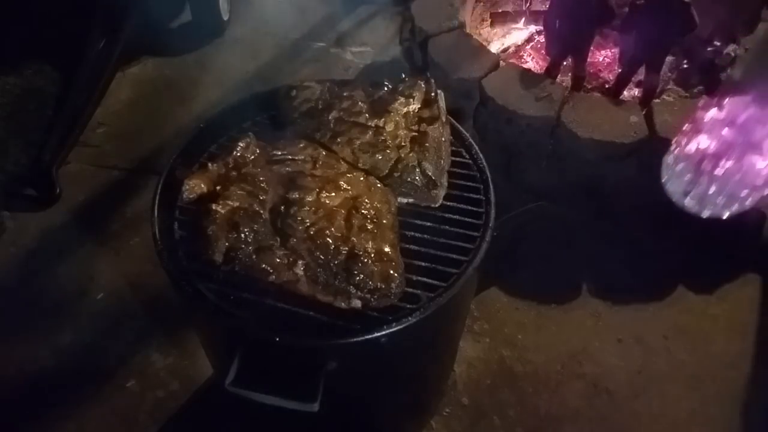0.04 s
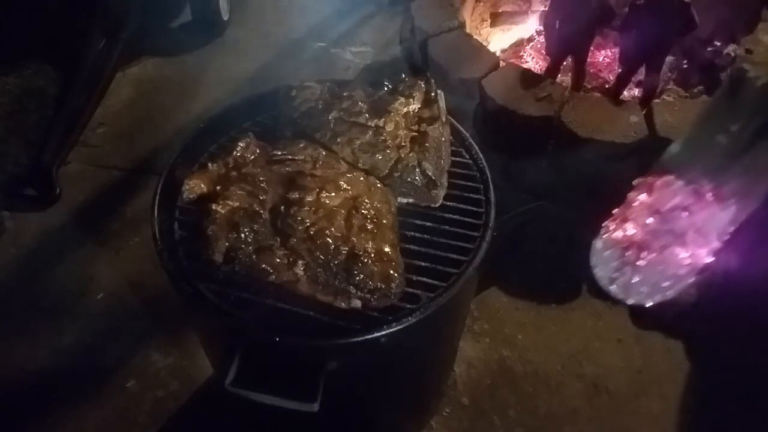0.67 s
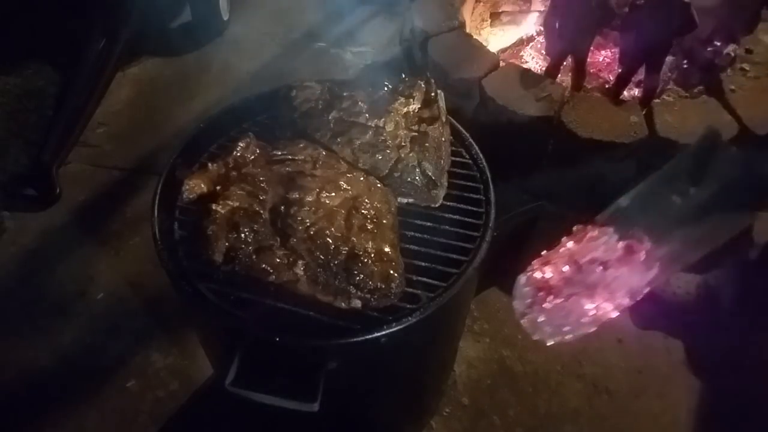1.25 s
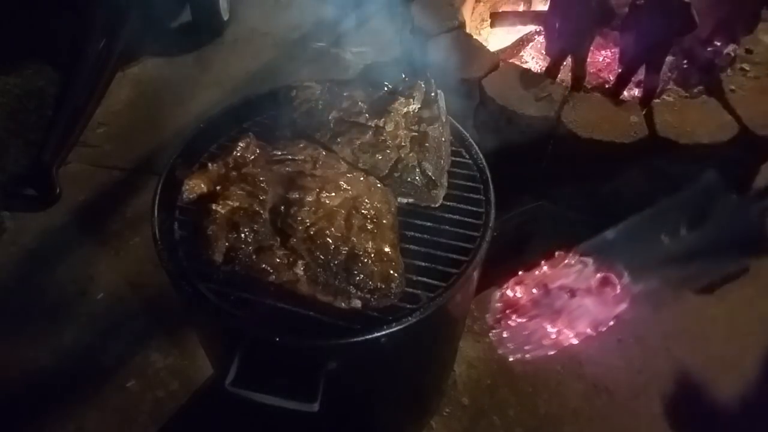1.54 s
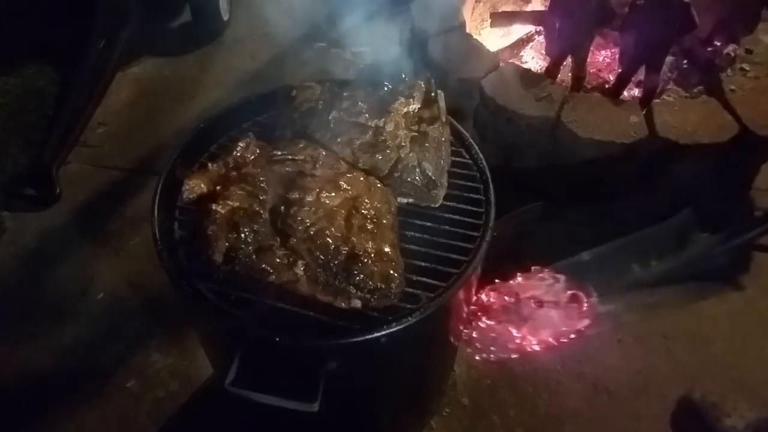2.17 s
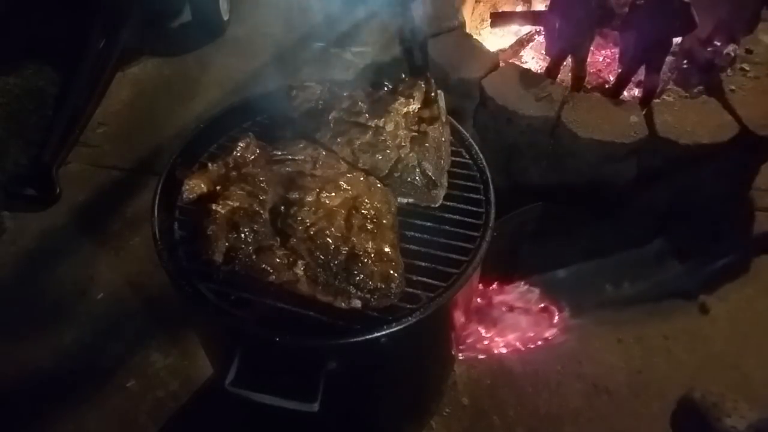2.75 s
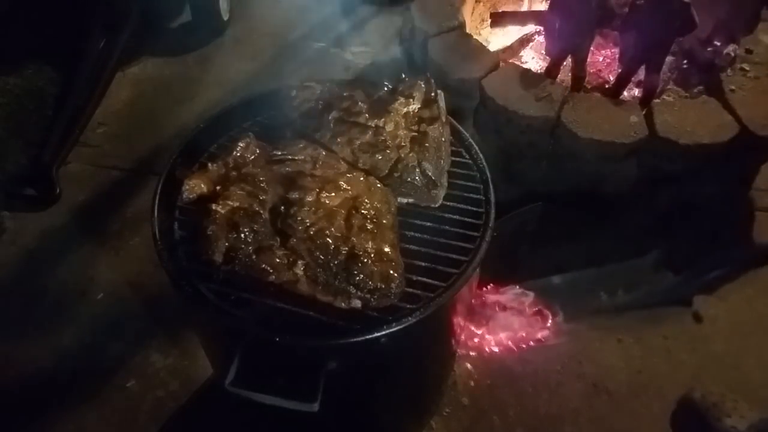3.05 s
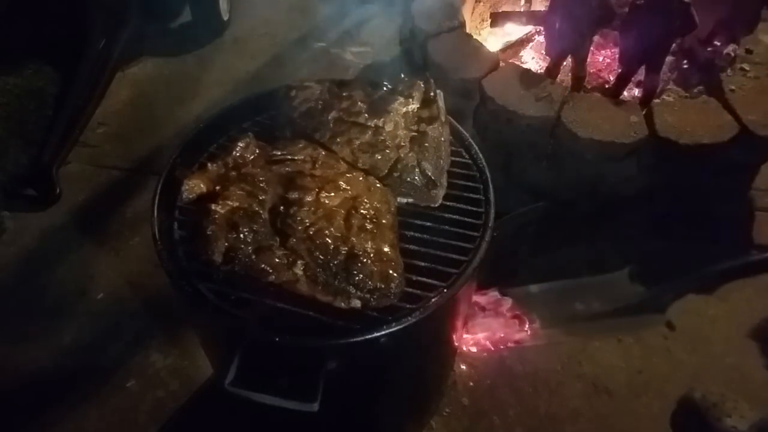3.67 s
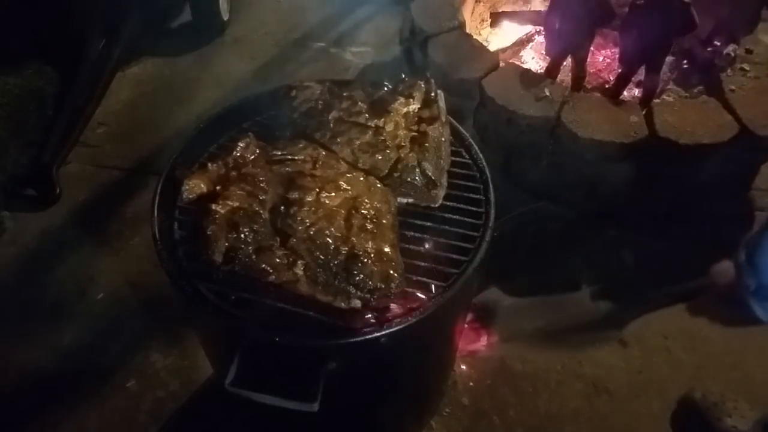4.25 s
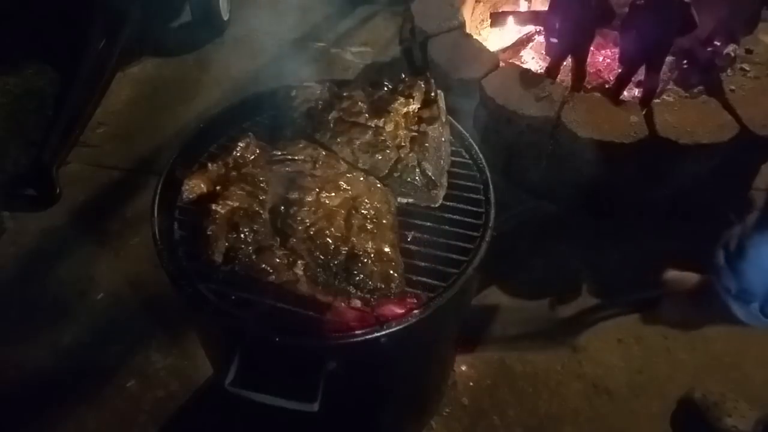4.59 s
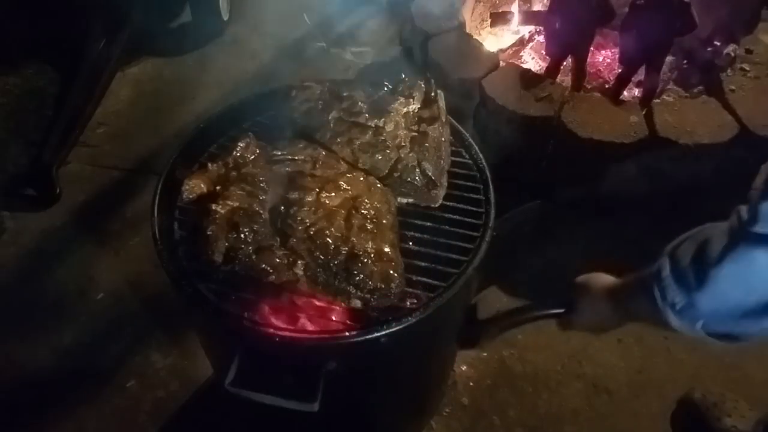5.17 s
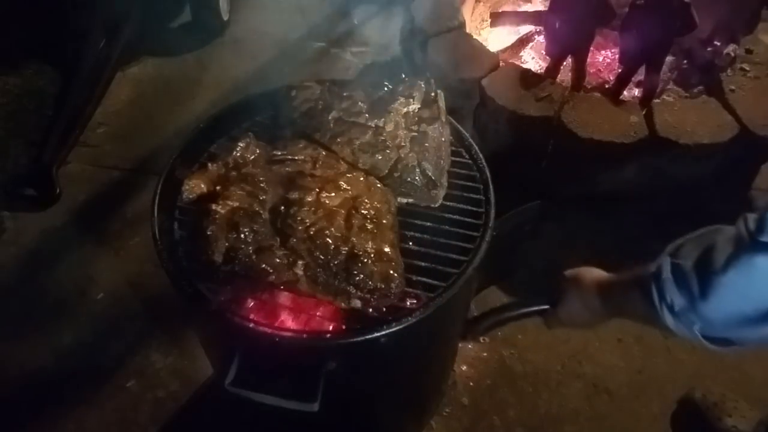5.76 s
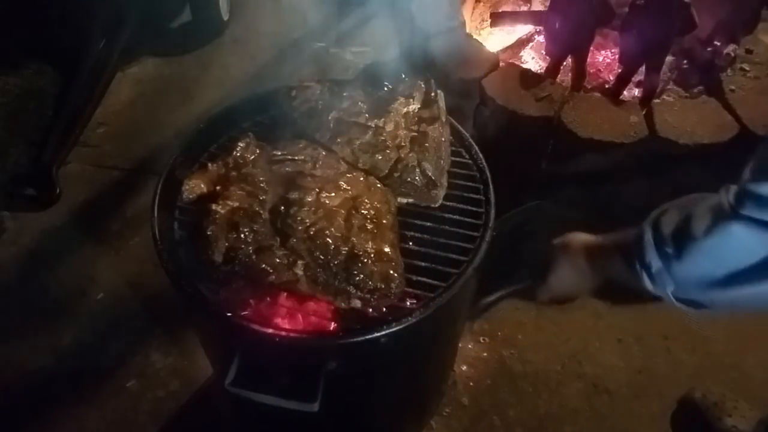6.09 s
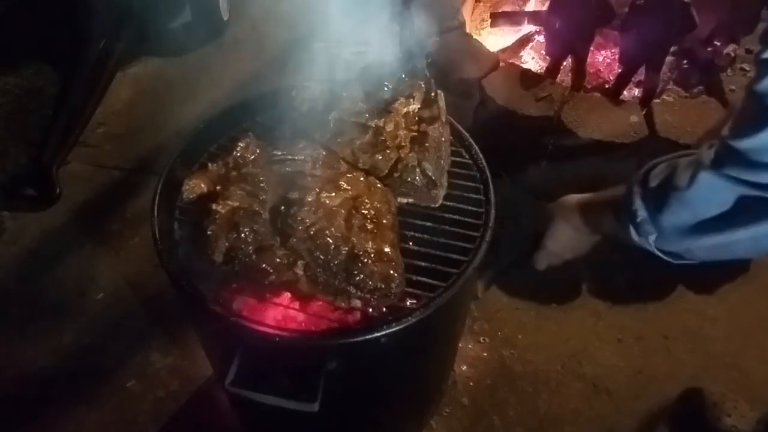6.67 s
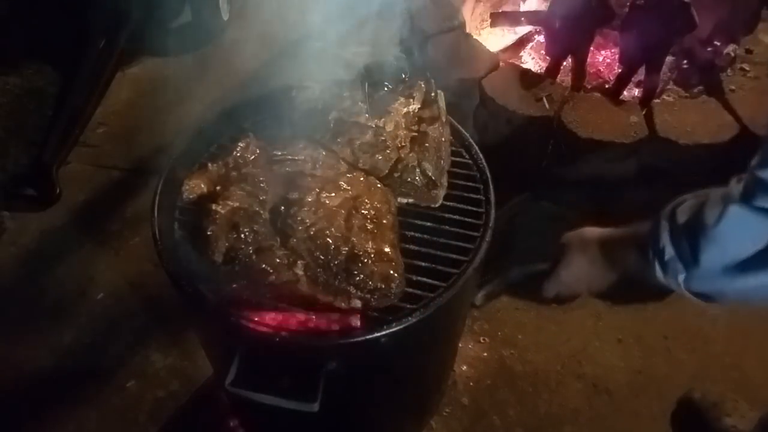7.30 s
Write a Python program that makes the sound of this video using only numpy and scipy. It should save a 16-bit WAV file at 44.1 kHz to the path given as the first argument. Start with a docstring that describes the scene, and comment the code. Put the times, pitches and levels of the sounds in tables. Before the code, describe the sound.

A low, distant rumble with a wavering hum runs throughout, outdoors. For the first two seconds, nearby embers sizzle faintly, with short spurts of hiss and sharp, high snaps, busiest around 1.5 seconds. At about 2.5 seconds a steel shovel bumps a small drum smoker, and more hollow knocks, clanks and short scrapes follow until 4 seconds. The blade then grinds in over grit, loudest around 4.3 to 4.5 seconds, where it squeals briefly on the rim and the drum booms and rings. The scraping carries on with heavy knocks near 4.7 and 5 seconds, while the sizzle swells slightly. From about 5.3 to 6 seconds the blade is shaken empty with clanks and judder. It is drawn back with ringing scrapes between 6 and 6.9 seconds, ending in a faint clink at 7 seconds. Scattered ember snaps continue through the shovelling.

```python
"""Embers sizzle and snap over a low, far-off hum, outdoors at night.
Then a steel shovel pushes glowing coals through the door of a small drum smoker.
The blade bumps the door, grinds in over grit, squeals as it sticks and slips on the rim,
is shaken empty and drawn back. Its knocks and judder make the drum boom and ring."""
import sys
import numpy as np
from scipy import signal
from scipy.fft import rfft, irfft
from scipy.io import wavfile

SR = 44100
rng = np.random.default_rng(int(sys.argv[2]) if len(sys.argv) > 2 else 0)


def to_wav(sig):
    """Store sig (one row per channel, or 1-D mono) as 16-bit WAV at the path in sys.argv[1].

    Samples outside -1..1 are clipped; the rate is SR.
    """
    pcm = np.clip(np.atleast_2d(sig), -1, 1) * 32767
    pcm = np.round(pcm).astype(np.int16)
    wavfile.write(sys.argv[1], SR, pcm.T)  # frames by channels


N = 323253
TIME = np.arange(N) / SR
FREQ = np.maximum(np.fft.rfftfreq(N, 1 / SR), 1)


def undb(db):
    """Turn decibels into a gain."""
    return 10 ** (np.asarray(db) / 20)


def unit(x):
    """Scale a signal to an average (rms) level of 1."""
    return x / np.sqrt(np.mean(x ** 2))


def add(track, start_s, sound):
    """Mix a sound into a track."""
    i = int(start_s * SR)
    track[..., i:i + sound.shape[-1]] += sound[..., :N - i]


def pan(x, left_db):
    """Make the left side louder than the right by left_db."""
    return x * undb(np.array([[left_db], [-left_db]]) / 2)


def gain_curve(points):
    """Gain at every moment, from (time_s, level_db) points."""
    time_s, level_db = np.transpose(points)
    return undb(np.interp(TIME, time_s, level_db))


def swell(start_s, rise_s, hold_s, fall_s, size=N):
    """A level that builds slowly, then fast, holds, and drops 20 dB every fall_s."""
    t = TIME[:size] - start_s
    build = np.clip(t / rise_s, 0, 1) ** 1.7
    return build * undb(-20 * np.clip((t - rise_s - hold_s) / fall_s, 0, 10))


def wander(turns_per_s, size=N):
    """A smooth random drift, typically about 1 away from zero."""
    points = rng.standard_normal(2048)
    return 1.2 * np.interp(TIME[:size] * turns_per_s, np.arange(len(points)), points)


def grains(per_s, spread_db, channels=1):
    """Random clicks, mostly small, a few large."""
    shape = (channels, N)
    sizes = undb(spread_db * np.minimum(rng.exponential(size=shape), 5))
    hits = rng.random(shape) < per_s / SR
    return unit(hits * rng.choice([-1, 1], shape) * sizes)


def stereo_noise(split_hz, size):
    """Noise that is nearly alike in both ears below split_hz and unrelated above it."""
    mid, side, stray = rng.standard_normal((3, size))
    side = signal.sosfilt(signal.butter(3, split_hz, "high", fs=SR, output="sos"), side)
    side += undb(-22) * stray
    return np.array([mid + side, mid - side]) / np.sqrt(2)


def colour(points):
    """Gain at every frequency, from (pitch_hz, level_db) points."""
    hz, db = np.transpose(points)
    return undb(np.interp(np.log(FREQ), np.log(hz), db))


def resonances(modes):
    """How each mode (a pitch at which a thing likes to ring) answers every frequency."""
    return np.array([undb(db) / (1 + 1j * (FREQ ** 2 - hz ** 2) / (FREQ * width))
                     for hz, width, db in modes])


def impulse(gain, band_hz=(0, SR), size=4096):
    """A filter's answer to one click. Only the shape of gain counts: band_hz is scaled to level 1."""
    in_band = (FREQ > band_hz[0]) & (FREQ < band_hz[1])
    gain = np.abs(gain) / np.sqrt(np.mean(np.abs(gain) ** 2 * in_band))
    gain = np.interp(np.fft.rfftfreq(4 * size, 1 / SR), FREQ, gain)
    # Folding the cepstrum puts all the ringing after the click.
    cepstrum = irfft(np.log(gain + 1e-6))
    cepstrum[1:2 * size] *= 2
    cepstrum[2 * size + 1:] = 0
    return irfft(np.exp(rfft(cepstrum)))[:size]


def modal(modes, spread_hz):
    """The ring of a group of modes, strongest within spread_hz around their middle."""
    middle_hz = np.mean([hz for hz, _, _ in modes])
    peaks = np.sqrt(np.sum(np.abs(resonances(modes)) ** 2, axis=0))
    focus = np.abs(resonances([(middle_hz, spread_hz, 0)])[0]) ** 2
    return impulse(peaks * focus)


def ring(x, response):
    """Play a signal through a filter, a ringing object or a space."""
    return signal.fftconvolve(np.atleast_2d(x), np.atleast_2d(response), axes=-1)[:, :x.shape[-1]]


def night(rumble_db=-56):
    """A far-off rumble and two low, wavering hums that swell and fade."""
    # Tone of the rumble: pitch_hz, relative_db
    rumble_colour = [(12, -36.5), (20, -11), (37, -9.5), (74, -1), (101, 1), (207, -11.5), (270, -8),
                     (342, -16), (735, -17), (1730, -33.5), (2670, -35.5), (6000, -54.5), (7800, -83),
                     (13200, -120)]
    # Hums: pitch_hz, glide_hz_per_s, loudest_s, level_db, rise_db_per_s, fade_db_per_s
    hums = [(106.7, .8, 1.7, -45, 6.5, 3.5), (89.2, -.4, 4.7, -48, 2, 10)]
    air = ring(stereo_noise(690, N), impulse(colour(rumble_colour), band_hz=(300, 1200)))
    out = air * undb(rumble_db + 0.23 * wander(3))
    for hz, glide, loudest_s, db, rise, fade in hums:
        t = TIME - loudest_s
        pitch_hz = hz + glide * t + 0.6 * wander(5.1)
        tone = unit(np.sin(2 * np.pi * np.cumsum(pitch_hz) / SR))
        out += tone * undb(db + np.minimum(rise * t, -fade * t) + 1.2 * wander(12))
    return pan(out, -0.46)


def sizzle(steady_db=-70, flare_db=-63.5):
    """Countless tiny bursts make a sizzle that flares as fresh coals are worked in."""
    # Spurts of steam: start_s, rise_s, hold_s, fall_s, hiss_db, fizz_db
    spurts = [(0.052, 0.018, 0.04, 0.12, -60, -65), (0.257, 0.013, 0.012, 0.07, -60.5, -75),
              (0.49, 0.041, 0.077, 0.5, -64, -62.5), (1.211, 0.027, 0.084, 0.11, -56, -54.5),
              (1.486, 0.011, 0.024, 0.09, -54.5, -56.5)]
    # Tone of the high hiss: pitch_hz, relative_db
    hiss_colour = [(1000, -2.5), (3000, 0), (6000, -3), (9000, -3.5), (12000, -0.5), (15000, 3),
                   (17000, -19)]
    # Tone of the lower fizz: pitch_hz, relative_db
    fizz_colour = [(600, 6.5), (1500, -0.5), (3000, 1.5), (4800, -1), (7000, -8.5), (12000, -23)]
    flare = undb(flare_db) * swell(start_s=1.99, rise_s=2.36, hold_s=1.84, fall_s=2.1)
    hiss, fizz = np.hypot(undb(steady_db), flare), np.zeros(N)
    for *timing, hiss_db, fizz_db in spurts:
        steam = swell(*timing)
        hiss = np.hypot(hiss, steam * undb(hiss_db))
        fizz += steam * undb(fizz_db)
    bursts = unit(rng.standard_normal((2, N)) + .7 * grains(500, 5, channels=2))
    flicker = undb(wander(35))
    high = ring(hiss * bursts * flicker, impulse(colour(hiss_colour), band_hz=(7000, 15000)))
    low = ring(fizz * grains(5000, 2.8, channels=2), impulse(colour(fizz_colour), band_hz=(2000, 6000)))
    return pan(high, 2.3) + low


def ember_snaps(snap_s=0.0012, tail_db=-24, tail_s=0.014, cooling_s=1.3, size=2048):
    """Coals split with a sharp tick, a lower crack and a faint tail."""
    # The loudest snaps: start_s, tick_db, pitch_hz, crack_db
    loud_snaps = [(0.5068, -22.5, 12700, -56), (1.075, -31.5, 13600, -33.5), (1.3242, -25.5, 13100, -53),
                  (1.498, -40, 4200, -45), (1.52, -28, 3760, -32), (1.6342, -20.5, 13100, -38),
                  (3.3754, -36.5, 12600, -65), (4.4942, -24, 12600, -29), (4.531, -25, 13050, -39),
                  (5.4, -26.5, 8470, -31), (5.8368, -27, 12200, -51), (6.0377, -22, 13100, -36),
                  (6.1816, -24, 7460, -45), (6.319, -20.5, 13800, -39)]
    # Faint snaps come at random, ever more rarely as the coals cool.
    faint_snaps = [(min(cooling_s * rng.exponential(), TIME[-1]), rng.normal(-44.5, 5),
                    12000 * rng.uniform(.7, 1.3), -60) for _ in range(9)]
    out, t = np.zeros((2, N)), TIME[:size]
    fade = np.exp(-t / snap_s) + undb(tail_db) * np.exp(-t / tail_s)
    for start_s, tick_db, hz, crack_db in loud_snaps + faint_snaps:
        tick_band_hz = [0.82 * hz, min(1.56 * hz, .45 * SR)]
        for band_hz, db in (tick_band_hz, tick_db), ([2200, 8000], crack_db):
            band_filter = signal.butter(2, band_hz, "band", fs=SR, output="sos")
            burst = signal.sosfilt(band_filter, rng.standard_normal((2, size)) * fade)
            add(out, start_s, undb(db) * burst / np.abs(burst).max())
    return pan(out, 3.3)


def stroke_forces():
    """How hard the sliding blade drives grinding, edge, boom and ash; overlapping strokes add in power."""
    # Strokes: start_s, rise_s, hold_s, fall_s, grind_db, then relative to it edge_db, boom_db, ash_db
    strokes = [(2.775, 0.016, 0.024, 0.15, -56, -35, 15.5, -19), (2.88, 0.026, 0.024, .05, -58, -6, 8, -14),
               (2.993, 0.0099, 0.029, 0.083, -46.5, -8.5, -3, -21),
               (3.045, 0.012, 0.026, 0.13, -51, -10.5, 9.5, -15),
               (3.49, 0.012, 0.013, 0.13, -56, -16, 9.5, -11), (3.86, 0.033, 0.24, .05, -58, -14.5, 4, -16),
               (4.088, 0.023, 0.056, .05, -40, -4, -6, -10.5),
               (4.141, 0.04, 0.17, 0.1, -34.5, -6.5, 2, -19),
               (4.312, 0.069, 0.07, 0.097, -28, 1.5, 0.5, -27),
               (4.489, 0.029, 0.578, 0.065, -37.3, -10, 1, -22.5),
               (4.625, 0.062, 0.076, 0.28, -43, 1.5, 6, -13.5),
               (4.85, .04, .1, 0.21, -44.5, 3.5, -12, -9.5),
               (5.04, 0.022, 0.06, 0.068, -42, -29, 11.5, -29),
               (5.15, 0.054, 0.056, 0.049, -51, -10, 11, -34.5),
               (5.267, 0.047, 0.083, 0.047, -44, -8.5, 4.5, -22),
               (5.523, 0.097, 0.007, 0.028, -46, -4, -2.5, -14),
               (5.651, 0.0077, 0.023, .065, -46, -16, 9.5, -22),
               (6.06, 0.016, 0.057, 0.32, -53.5, -6, -22, -22),
               (6.161, 0.1, 0.046, 0.14, -36, -7, -5.5, -13.5),
               (6.546, 0.076, .015, 0.12, -40.5, -11, -10.5, -13),
               (6.78, 0.039, .025, .04, -57.5, -4.5, -7, -7.5)]
    power = np.zeros((4, N))
    for start_s, rise_s, hold_s, fall_s, grind_db, *relative_db in strokes:
        push = swell(0, rise_s, hold_s, fall_s, size=SR)
        gains = undb(grind_db + np.array([0, *relative_db]))
        add(power, start_s, np.outer(gains, push) ** 2)
    return np.sqrt(power)


def hollow(echo_s, direct_db, size=16384):
    """Inside the drum: the direct sound, then dense echoes that fade 60 dB in echo_s."""
    response = unit(stereo_noise(680, size) * undb(-60 * TIME[:size] / echo_s)) / np.sqrt(size)
    response[:, 0] += undb(direct_db)
    return response / np.sqrt(1 + undb(2 * direct_db))


def blade_steel(split_hz=2300):
    """How the blade rings: its flat gives the lower modes, its edge the upper ones."""
    # Overall tone of the steel: pitch_hz, relative_db
    steel_colour = [(150, -27.5), (300, 7), (480, 4), (650, 2), (1000, -3), (1300, 0.5), (1850, -1.5),
                    (2400, -2.5), (3000, -3.5), (4100, -8.5), (4700, -15.5), (6000, -23.5), (9000, -31.5),
                    (16000, -37)]
    # The blade's ringing pitches: pitch_hz, width_hz, relative_db
    steel_modes = [(837, 69, 2), (1135, 52, 3.5), (1307, 120, -1), (1506, 83, 0.5), (1796, 40, 0.5),
                   (1970, 75, -5), (2154, 44, 1), (2500, 28, -3.5), (2700, 49, -15), (3060, 60, -14.5),
                   (3307, 86, 1.5), (3630, 170, -1), (3860, 75, -13.5), (3900, 43, -1.5), (4030, 45, -8),
                   (4670, 18, -8.5)]
    peak_power = np.sum(np.abs(2 * resonances(steel_modes)) ** 2, axis=0)
    steel = colour(steel_colour) * np.sqrt(1 + peak_power)
    upper = 1 / (1 + (split_hz / FREQ) ** 6)
    flat_ring = impulse(steel * np.sqrt(1 - upper), band_hz=(700, 1900))
    edge_ring = impulse(steel * np.sqrt(upper), band_hz=(3400, 5000))
    return flat_ring, edge_ring


def blade(grind, edge, ash, knocks, inside, near, bite_s=0.0051, skid_s=0.0096, crack_s=0.0027):
    """Clanks and breaking grit ring the blade and the drum's floor plate, and shake ash loose."""
    # The blade is struck and skids: start_s, flat_db, edge_db
    clanks = [(2.459, -46, -65), (2.738, -37, -53.5), (2.772, -34, -51), (3.005, -36.5, -49),
              (3.477, -24.5, -41.5), (3.802, -35.5, -44.5), (4.068, -37, -61), (4.105, -34, -49),
              (4.345, -34, -28), (5.395, -30, -44.5), (5.658, -35.5, -44), (5.802, -34, -41.5),
              (5.938, -32, -30.5), (6.044, -42, -37), (6.078, -44, -43), (6.434, -56, -40),
              (6.522, -42, -38.5), (6.854, -37.5, -45), (7.039, -51, -45.5)]
    # Coals damp the tip, which rings as the blade empties: time_s, level_db (relative to the edge)
    tip_free = [(4.18, -10), (4.3, -21), (5.6, -9), (6.3, -1.5), (6.85, 5.5)]
    # The blade drags on the floor plate: time_s, level_db (relative to the grinding)
    on_plate = [(4.45, -11), (4.78, 0.5), (4.96, -0.5), (5.15, -11)]
    # The tip's ringing pitches: pitch_hz, width_hz, relative_db
    tip_modes = [(3380, 120, -4), (3810, 90, -6), (3917, 70, -2.5), (4070, 100, -6), (4600, 400, -13)]
    # The plate's ringing pitches: pitch_hz, width_hz, relative_db
    plate_modes = [(844, 99, -13.5), (1194, 31, 1.5), (1243, 15, -0.5)]
    # Tone of the hissing ash: pitch_hz, relative_db
    ash_colour = [(3000, -2), (6000, 1), (8000, -1), (11000, -2.5), (15000, 0.5), (17000, 0.5)]
    catch = undb(2.5 * wander(55))  # the blade catches and frees itself
    grind, edge, ash = grind * catch, edge * catch, ash * catch
    tip, plate = edge * gain_curve(tip_free), grind * gain_curve(on_plate)
    t = TIME[:SR // 4]
    skid = (1 - np.exp(-t / bite_s)) * np.exp(-t / skid_s)
    for start_s, flat_db, edge_db in clanks:
        add(grind, start_s, undb(flat_db) * skid)
        add(edge, start_s, undb(edge_db) * skid)
        add(tip, start_s, undb(edge_db + 3) * skid)
        add(ash, start_s, undb(edge_db - 11) * skid)
    for start_s, _, overtone_db in knocks:  # a hard knock also cracks against the flat
        add(grind, start_s, undb(overtone_db - 9) * np.exp(-t / crack_s))
    flat_ring, edge_ring = blade_steel()
    coarse, fine, crumbs = grains(1600, 3), grains(1800, 3.2), grains(1300, 4.2, channels=2)
    metal = ring(grind * coarse, flat_ring) + ring(edge * fine, edge_ring)
    singing = ring(tip * grains(4000, 1.5), modal(tip_modes, spread_hz=1500))
    singing += ring(plate * grains(2500, 4.4), modal(plate_modes, spread_hz=921))
    dust = ring(ash * crumbs, impulse(colour(ash_colour), band_hz=(7000, 15000)))
    return ring(metal, inside) + ring(singing, near) + pan(dust, 2.5)


def drum(boom, grind, knocks):
    """Knocks and the judder of the sliding blade ring the drum's wall."""
    # The wall's low booming pitches: pitch_hz, width_hz, relative_db
    wall_modes = [(135, 35, -11), (183, 23, -6.5), (198.6, 13, 5.5), (237.3, 13, 1)]
    # Its harder overtones: pitch_hz, width_hz, relative_db
    overtones = [(310, 35, -1.5), (382, 21, 4.5), (462, 23, 2), (500, 60, -2.5)]
    low, hard = modal(wall_modes, spread_hz=224), modal(overtones, spread_hz=450)
    out = ring(boom * grains(1200, 3.6), low)
    out += ring(grind * undb(-10.5) * grains(900, 0.51), hard)
    for start_s, boom_db, overtone_db in knocks:
        add(out, start_s - .002, undb(boom_db) * low / np.abs(low).max())
        add(out, start_s, undb(overtone_db) * hard / np.abs(hard).max())
    return pan(out, -1.2)


def rim_squeal(space, waver_hz=50, chatter_db=2.8, grip_s=0.0046, size=16384):
    """The edge sticks and slips on the rim, locking onto one ringing pitch after another."""
    # Squeals: start_s, length_s, pitch_hz, level_db
    squeals = [(3.534, 0.0068, 3260, -48), (4.342, 0.037, 2780, -21), (4.355, 0.061, 3310, -18),
               (4.397, 0.044, 2005, -20.5), (4.403, 0.032, 4017, -23), (4.420, 0.026, 2825, -21.5),
               (4.456, .02, 2130, -23), (4.461, 0.025, 3080, -22), (4.465, 0.042, 2855, -24.5),
               (4.486, 0.066, 2174, -27.5)]
    out, t = np.zeros((2, N)), TIME[:size]
    for start_s, length_s, hz, db in squeals:
        slips = waver_hz * wander(600, size)
        chatter = undb(chatter_db * wander(500, size))
        phase = 2 * np.pi * np.cumsum(hz + slips) / SR
        grip = np.clip(np.minimum(t, length_s - t) / grip_s, 0, 1)
        tone = ring(np.sin(phase) * grip * chatter, space)
        add(out, start_s, unit(tone) * np.sqrt(length_s * SR / size) * undb(db))
    return out


def scene():
    """Shovel, drum, embers and the night around them."""
    # The blade knocks on the drum, and both sound: start_s, boom_db, overtone_db
    knocks = [(2.462, -28, -55), (2.734, -35, -35.5), (2.766, -27.5, -27), (3.042, -29.5, -36),
              (3.272, -44.5, -56), (3.418, -40, -46), (3.48, -37.5, -31.5), (3.807, -35.5, -54),
              (3.938, -37.5, -50), (4.037, -34.5, -38), (4.162, -26, -42), (4.294, -20, -38),
              (4.352, -24.5, -17.5), (4.732, -23, -25.5), (5.008, -26, -36), (5.528, -39, -47),
              (5.575, -36, -40.5), (5.8, -38, -46)]
    grind, edge, boom, ash = stroke_forces()
    inside = hollow(echo_s=0.22, direct_db=-5.5)
    near = hollow(echo_s=0.14, direct_db=-4.5)
    shovel = blade(grind, edge, ash, knocks, inside, near) + rim_squeal(near)
    return shovel + drum(boom, grind, knocks) + ember_snaps() + sizzle() + night()


def record(dry, low_hz=30, top_hz=16000):
    """Cut the deepest rumble and the highest treble."""
    dry = signal.sosfilt(signal.butter(2, low_hz, "high", fs=SR, output="sos"), dry)
    return signal.sosfilt(signal.ellip(8, .2, 70, top_hz, fs=SR, output="sos"), dry)


dry = scene()
out = record(dry)
to_wav(out)
```